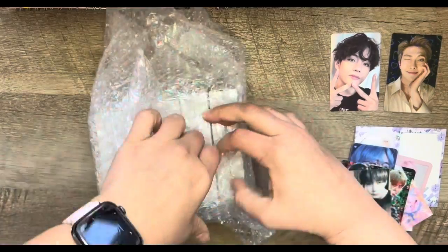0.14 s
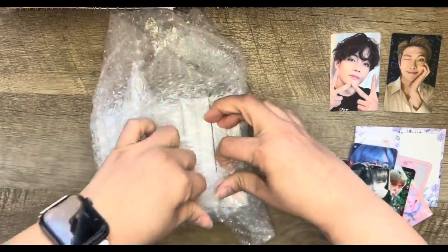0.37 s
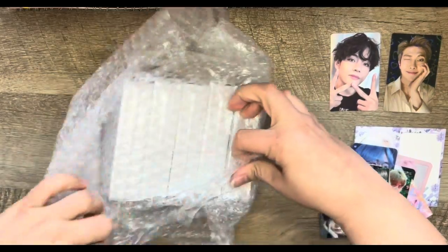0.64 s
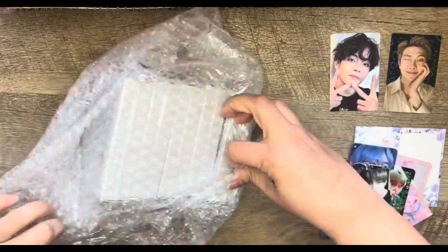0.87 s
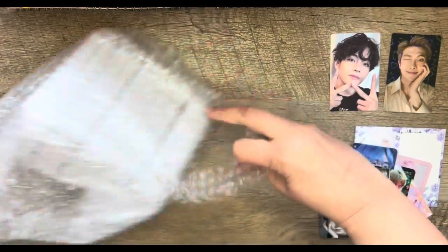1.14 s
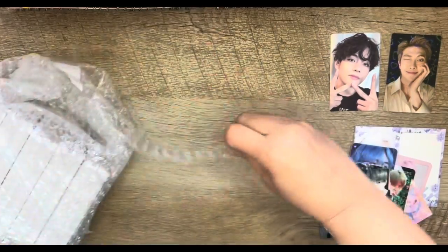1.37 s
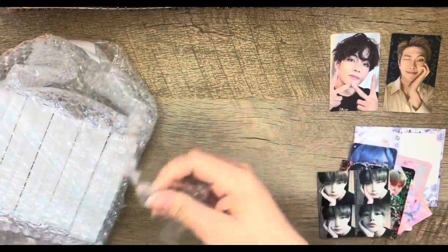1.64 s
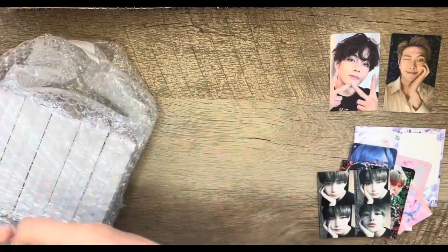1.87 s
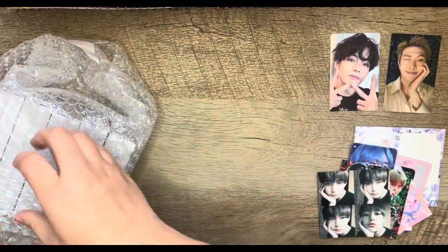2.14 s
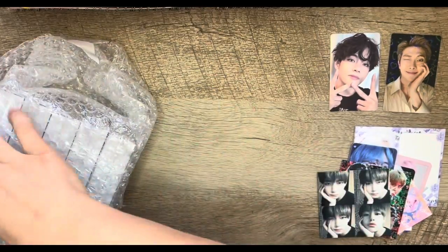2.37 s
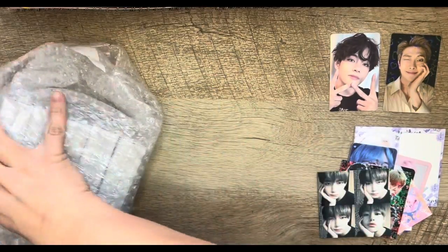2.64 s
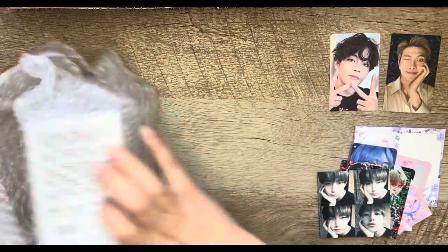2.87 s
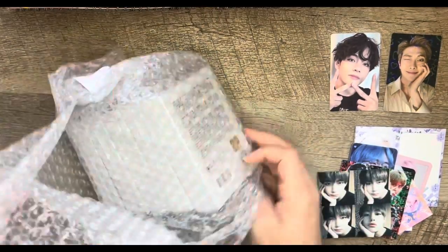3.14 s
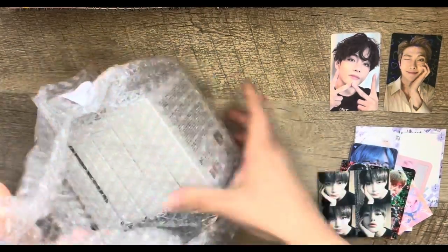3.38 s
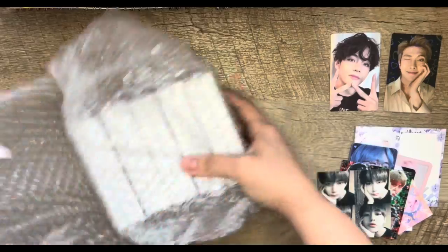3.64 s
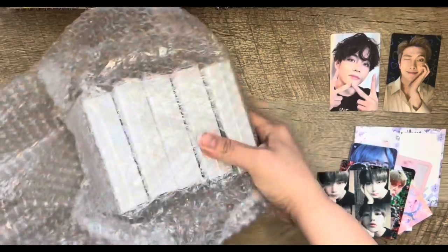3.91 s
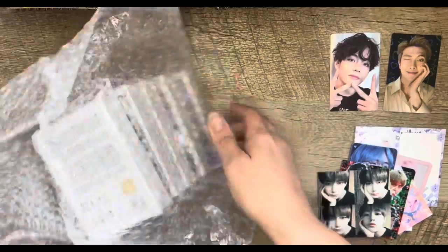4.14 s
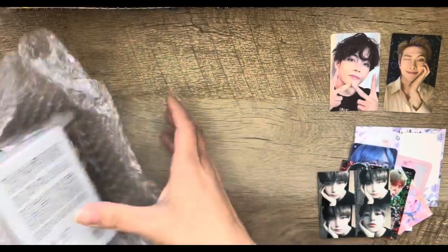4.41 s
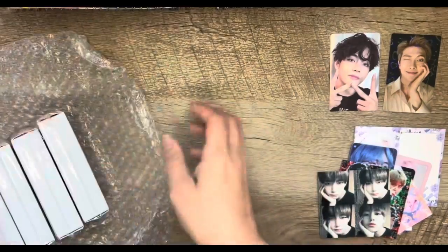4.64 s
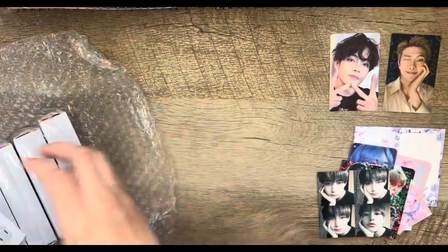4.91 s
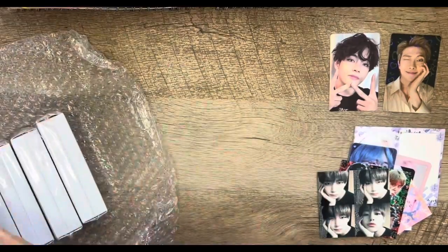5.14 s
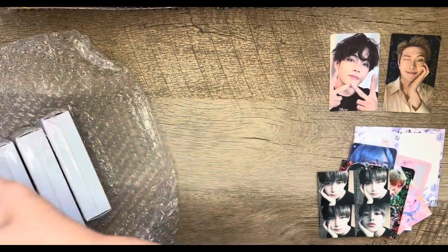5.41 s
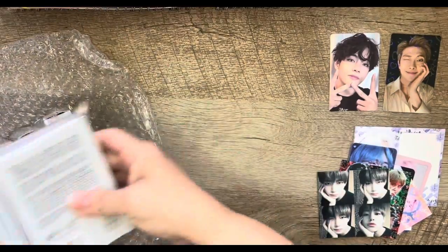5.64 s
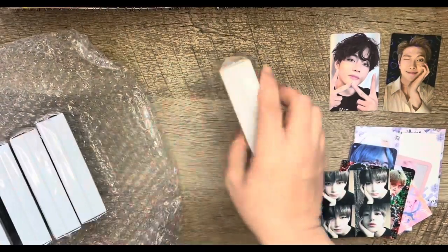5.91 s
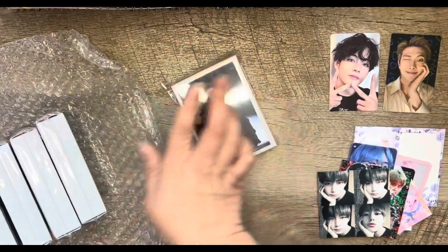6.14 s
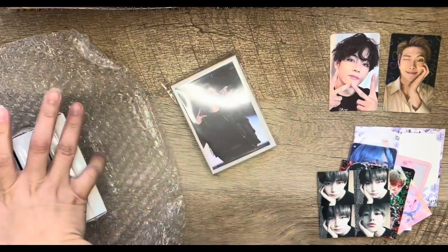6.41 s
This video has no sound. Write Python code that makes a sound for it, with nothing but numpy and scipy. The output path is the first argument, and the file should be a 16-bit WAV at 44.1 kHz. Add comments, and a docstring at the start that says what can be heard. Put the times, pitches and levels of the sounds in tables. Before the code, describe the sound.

Close to the microphone, hands work at crinkly bubble wrap: a faint rustle, then bright snapping crackles, a harsh tape rip with popping air pockets around one second, then quieter rustling. Louder crinkles return midway, and boxes knock on the wooden table. A final sharp burst of crackling is followed by a hard clack as a box is set down. Quiet, small, lightly humming room.

```python
"""On a wooden table in a quiet, humming room, hands pull bubble wrap open, lift small boxes out and set one down.
The film buckles as bursts of shaped noise, dense and tiny or single and loud, with decaying cycles for popping
air pockets and ticks. Boxes and hands excite decaying modes of the table, and its bending waves bring the bass
late. Shaped noise makes the dragging and the room; a short dull reverb follows, heard at two close phone ports."""
import sys
import numpy as np
from scipy import signal
from scipy.fft import rfft, irfft, next_fast_len
from scipy.io import wavfile
from scipy.ndimage import uniform_filter1d

SR = 44100
rng = np.random.default_rng(int(sys.argv[2]) if len(sys.argv) > 2 else 0)


def ratio(d):
    """dB to gain"""
    e = np.asarray(d, float) / 20
    return 10 ** e


def to_wav(sig):
    """Store sig (one row per channel, or 1-D mono) as 16-bit WAV at the path in sys.argv[1].

    Samples outside -1..1 are clipped; the rate is SR.
    """
    pcm = np.clip(np.atleast_2d(sig), -1, 1) * 32767
    pcm = np.round(pcm).astype(np.int16)
    wavfile.write(sys.argv[1], SR, pcm.T)  # frames by channels


N = 287973
SIZE = next_fast_len(N)


def curve(points, hz, column=1):
    """Reads a table of f/Hz and level/dB on a log-frequency axis, as gain."""
    p = np.array(points, float)
    return ratio(np.interp(np.log(np.maximum(hz, 1)), np.log(p[:, 0]), p[:, column]))


def colour(x, points, column=1):
    """Shapes the spectrum of x by a table of f/Hz and level/dB."""
    gain = curve(points, np.fft.rfftfreq(SIZE, 1 / SR), column)
    return irfft(rfft(x, SIZE) * gain, SIZE)[..., :N]


def unit(x):
    """Scales to rms 1."""
    return x / np.sqrt(np.mean(x ** 2))


def band(x, lo_hz, hi_hz):
    """Causal band-pass."""
    sos = signal.butter(2, [lo_hz, min(hi_hz, .45 * SR)], "bandpass", fs=SR, output="sos")
    return signal.sosfilt(sos, x)


def fade(power, t60):
    """Gives every impulse of power an exponential tail, 60 dB down after t60 seconds."""
    return signal.lfilter([1], [1, -np.exp(-2 * np.log(1000) / (t60 * SR))], power)


def walk(rate):
    """Random levels held 1 / rate s and slewed twice; spread near 1."""
    hold = int(SR / rate)
    steps = np.repeat(rng.standard_normal(N // hold + 1), hold)
    return 0.73 * uniform_filter1d(uniform_filter1d(steps, hold), hold)[:N]


def arrivals(count, columns, per_s):
    """Random instants with exponential gaps, as samples, and a row of uniform draws for each."""
    chance = rng.random((count, columns))
    gaps_s = -np.log(1 - chance[:, 0]) / per_s
    at = (np.cumsum(gaps_s) * SR).astype(int)
    return at[at < N], chance[at < N, 1:]


def at_band(hz, body_db, middle_db, treble_db):
    """Level at hz, blended between the body, the middle and the treble."""
    body = np.clip(np.log2(2400 / hz), 0, 1)
    treble = np.clip(np.log2(hz / 5500), 0, 1)
    return middle_db + body * (body_db - middle_db) + treble * (treble_db - middle_db)


def slice_at(x, hz):
    """Takes one of a set of overlapping half-octave bands with raised-cosine edges."""
    steps = 2 * np.log2(np.maximum(np.fft.rfftfreq(SIZE, 1 / SR), 1) / hz)
    return irfft(rfft(x, SIZE) * np.cos(np.pi / 2 * np.clip(steps, -1, 1)) ** 2, SIZE)[..., :N]


# hands working the film: t/s, rustle level in the middle/dB, body level over the middle/dB
RUSTLE_PATH = [(0, -42, -6), (.12, -45, -5.5), (.18, -40.5, -10), (0.299, -43.5, -6), (.335, -26, -10.5),
               (.4, -30, -5.5), (.455, -31.5, -6), (.475, -23.5, -10.5), (.7, -28.5, -3.5),
               (.73, -35.5, -7), (.77, -31, -8), (.79, -28.5, -4.5), (.85, -33.5, -13.5),
               (0.929, -42.5, -7), (.96, -28.5, -11.5), (1.02, -22.5, -3), (1.05, -24, -7),
               (1.074, -37, -8), (1.1, -34, -8), (1.14, -33, -21), (1.165, -41, -6), (1.23, -46, -4),
               (1.32, -36.5, -8.5), (1.38, -46, -9.5), (1.61, -48, -5.5), (1.75, -55, -13),
               (1.94, -49, -10), (2.0, -43, -11), (2.06, -51.5, -5.5), (2.18, -48, -23.5),
               (2.31, -62, -2.5), (2.4, -59, -12), (2.46, -50.5, -8.5), (2.58, -43, -7.5), (2.66, -41, -10),
               (2.7, -42, -6), (2.79, -37.5, -11), (2.86, -37, -8.5), (2.92, -36.5, -5.5),
               (3.04, -42.5, -7.5), (3.12, -38.5, -5), (3.17, -42, -5), (3.21, -38.5, -9), (3.3, -40, -9.5),
               (3.37, -43.5, -7.5), (3.46, -40.5, -8), (3.5, -32, -9), (3.55, -32, -10),
               (3.62, -26.5, -4.5), (3.66, -34, -5), (3.76, -37, -6.5), (3.92, -40, -7), (4.02, -39.5, -6),
               (4.08, -42.5, -9), (4.21, -37, -7), (4.33, -42.5, -12.5), (4.38, -37.5, -2.5),
               (4.44, -40.5, -8.5), (4.49, -36, -2), (4.63, -53.5, -10.5), (4.891, -57, -10),
               (4.95, -51.5, -3), (5.09, -56.5, -10.5), (5.14, -47.5, -2.5), (5.265, -51, -13),
               (5.285, -39, -1.5), (5.33, -45.5, -10), (5.4, -41.5, -11), (5.45, -35, -9),
               (5.53, -39, -14.5), (5.64, -38.5, -5), (5.71, -45, -13), (5.98, -47, -3), (6.11, -51.5, 1.5),
               (6.2, -60, 2), (6.41, -63, -6), (6.46, -50.5, -4.5), (6.53, -46, -8)]


def handling_db(column):
    """Draws one level column of the handling as a line through every sample."""
    rows = np.transpose(RUSTLE_PATH)
    return np.interp(np.arange(N) / SR, rows[0], rows[column])


# loud snaps of film and tape: t/s, level in the middle/dB, body level over the middle/dB
LOUD_SNAPS = [(0.2776, -16.5, -10), (0.317, -24, -11), (0.337, -20, -8.5), (0.354, -21, -9),
              (.3848, -21, -14.5), (0.477, -26, -18.5), (0.537, -23, 1), (0.554, -25, -11),
              (0.5666, -22, -5), (.599, -19.5, -4), (0.6222, -22.5, -5), (0.6475, -19, -4.5),
              (0.6606, -21.5, -20), (0.699, -23, -21), (0.7102, -23.5, -11.5), (0.7804, -23.5, -4),
              (.9, -37.5, -4), (0.9476, -27, -8), (1.0167, -24.5, 3), (1.029, -18.5, -2.5),
              (1.0586, -11.5, -9), (1.0684, -14, -5), (1.0785, -14, -4.5), (1.13, -10, -8),
              (1.1399, -18, 5), (1.1436, -16.5, -10.5), (1.313, -31, -19), (1.3259, -23.5, -12),
              (1.349, -30, -10), (1.453, -37, -5), (1.6761, -41, -18), (1.9644, -39.5, -24),
              (1.985, -41, -15), (2.01, -35.5, -11), (2.024, -40.5, -5), (2.3298, -45, -24),
              (2.434, -41.5, -16.5), (2.5782, -44, -14), (2.616, -48, -9), (2.864, -33, -4),
              (2.9179, -22.5, -10.5), (2.9852, -41.5, -16), (3.0962, -37, -9), (3.113, -36, -16),
              (3.122, -34, -12), (3.1628, -42, -15), (3.2135, -33.5, -5), (3.2747, -28.5, -14),
              (3.305, -45, -19.5), (3.323, -24.5, -9), (3.3656, -51, -16), (3.408, -28.5, -15),
              (3.5022, -30, 2.5), (3.5152, -31.5, 0), (3.5726, -15.5, -1.5), (3.594, -24.5, 3.5),
              (3.603, -22, -13.5), (3.621, -24, -5), (3.627, -21, -23), (3.697, -29, -14), (3.714, -26, -4),
              (3.7828, -37, -16), (3.8325, -29.5, -14), (3.932, -42, -17), (3.981, -46, -25),
              (4.205, -31.5, -13), (4.213, -32, 2.5), (4.3657, -22, -2), (4.4705, -27, 6),
              (4.474, -26.5, -2.5), (4.4785, -25, -3), (4.484, -29, 1), (4.547, -38, -2),
              (4.9303, -41.5, 6.5), (5.116, -40, -16), (5.277, -39.5, -1), (5.358, -32.5, -3),
              (5.3652, -33.5, 7), (5.4211, -16, -13.5), (5.428, -17.5, -7.5), (5.43, -12, -15),
              (5.4378, -14.5, -4), (5.455, -15, -9.5), (5.4644, -18, -11.5), (5.4781, -16, -9),
              (5.497, -20.5, -22), (5.545, -34, -25), (5.6105, -31.5, -24), (5.6356, -12, -13.5),
              (6.0198, -26.5, 3.5), (6.0307, -29.5, 6), (6.084, -30.5, -28.5), (6.14, -21, -4),
              (6.1429, -26, -3), (6.146, -32.5, 7.5), (6.426, -45.5, -22)]


def snaps(rustle_db):
    """Sudden buckling: loud snaps, a stick-slip tape rip and random lesser snaps that follow the rustle.

    Returns sample, middle, body and treble dB."""
    s, middle, body = np.transpose(LOUD_SNAPS)
    # the tape rips in seven unevenly timed steps
    rip_start_s, rip_gap_s, rip_db, rip_body_db = 1.085, 0.006, -13.5, -2.5
    slips = rng.standard_normal((7, 3))
    rip_s = rip_start_s + rip_gap_s * (np.arange(len(slips)) + 0.17 * slips[:, 0])
    rip_middle = rip_db + 2.5 * slips[:, 1]
    rip_body = rip_body_db + 2.5 * slips[:, 2]
    # lesser snaps: mostly near the rustle, now and then well above it
    stray_at, chance = arrivals(400, 3, per_s=16)
    stray_middle = rustle_db[stray_at] - 2 - 2 * np.log(1 - .9 * chance[:, 0])
    stray_body = -6.5 + 14 * (chance[:, 1] - .5)
    at = np.r_[(np.r_[s, rip_s] * SR).astype(int), stray_at]
    middle = np.r_[middle, rip_middle, stray_middle]
    body = np.r_[body, rip_body, stray_body]
    # big creases have more body and less treble
    treble = -11 - 0.56 * body
    return at, middle, middle + body, middle + treble


BANDS_HZ = 280 * 2 ** np.arange(0, 6.1, .5)
# colour of the film noise: f/Hz, relative level per Hz/dB
FILM_COLOUR = [(150, -63), (250, -8.5), (500, -7), (1050, -7), (1400, -6), (2000, -2), (4000, -2.5),
               (7000, -3), (9000, -7), (12000, -9.5), (14000, -15.5), (15800, -16.5), (16300, -78)]
# body, middle and treble zones of the film: low edge f/Hz, high edge f/Hz
FILM_ZONES = [(500, 1500), (2000, 8000), (8000, 15000)]


def film():
    """Buckling creases: bursts of film noise with a sharp start; row 0 reaches both ports, row 1 is unshared."""
    middle_db = handling_db(column=1)
    body_db = middle_db + handling_db(column=2)
    treble_db = middle_db - 1.5
    count, hiss = 5000, .25  # faint creases, steady share of the rustle power
    at = rng.integers(0, N, count)
    # many faint creases, few strong ones
    size_db = np.minimum(4 * rng.exponential(1, count), 13)
    snap_at, snap_middle, snap_body, snap_treble = snaps(middle_db)
    carrier = colour(rng.standard_normal((2, N)), FILM_COLOUR)
    # gains that bring each zone of the film's colour to unit level
    unit_body, unit_middle, unit_treble = (-20 * np.log10(np.std(band(carrier, *z))) for z in FILM_ZONES)
    # a film surface sheds its noise evenly from one instant to the next
    carrier /= np.sqrt(uniform_filter1d(carrier ** 2, size=45)) / np.std(carrier)
    flutter_db = 0.83 * walk(16)
    # the crease flips in one step, inward or outward, just after the snap starts
    crack_db, tail_db, settle_s, click_db, click_s = 3.0, -23, 0.18, 15, .0008
    flip = np.sign(rng.standard_normal((2, len(snap_at))))
    flip_at = np.minimum(snap_at + int(click_s * SR), N - 1)
    out = 0
    for hz in BANDS_HZ:
        # bigger patches of film ring lower and longer
        t60 = 0.023 * (3000 / hz) ** 0.053
        patchy_db = 3.5 * rng.standard_normal(count)
        small = fade(np.bincount(at, ratio(2 * (size_db + patchy_db)), N), t60)
        small = (1 - hiss) * small / small.mean() + hiss
        # as the sheet shifts, other patches take over and the colour wanders
        wander_db = 1.8 * walk(18)
        small *= ratio(2 * (flutter_db + wander_db + at_band(hz, body_db, middle_db, treble_db)))

        loud_db = at_band(hz, snap_body, snap_middle, snap_treble)
        loud_db += 2.5 * rng.standard_normal(len(snap_at))
        # a small crease is too small to radiate bass
        loud_db -= 1.8 * max(np.log2(600 / hz), 0)
        hits = np.bincount(snap_at, ratio(2 * loud_db), N)
        # a sharp crack, a short ring, then the crease keeps settling
        crack = ratio(2 * crack_db) * fade(hits, 0.0011)
        settling = ratio(2 * tail_db) * fade(hits, settle_s)
        # a snap takes a fraction of a millisecond to build
        loud = uniform_filter1d(crack + fade(hits, t60) + settling, size=13)

        click = np.array([np.bincount(flip_at, way * ratio(loud_db + click_db), N) for way in flip])
        click *= curve(FILM_COLOUR, hz)
        # clicks are weaker in the bass, the unshared ones more so
        click *= min(hz / 2500, 1) * np.array([[1], [min(hz / 3000, 1)]])
        gain = ratio(at_band(hz, unit_body, unit_middle, unit_treble))
        out = out + gain * slice_at(carrier * np.sqrt(small + loud) + click, hz)
    return out


# colour of the room: f/Hz, relative level per Hz/dB
ROOM_COLOUR = [(15, -47.5), (25, 9), (70, 22.5), (180, -2.5), (427, 7), (988, -58), (1790, 0), (2760, -18),
               (2990, -16), (3920, -53), (7110, -2.5), (11300, -42), (16000, -37)]


def room_tone():
    """Low rumble and faint hiss: shaped noise whose level wanders gently."""
    noise = colour(rng.standard_normal((2, N)), ROOM_COLOUR)
    # sound from all sides differs more between the ports than sound from close by
    diffuse = ratio(np.array([[0], [5.0]]))
    return diffuse * unit(noise) * ratio(-56 + 1.6 * walk(4.4))


# the parcel dragging on the table: t/s, level/dB
DRAG_PATH = [(0, -53), (.37, -60), (.4, -45), (.46, -52), (.52, -61), (.57, -46), (.67, -37), (.72, -49),
             (.8, -40.5), (.9, -68), (1.0, -38.5), (1.14, -38), (1.2, -51.5), (1.5, -61), (2.4, -62.5),
             (2.9, -47), (3.1, -59), (3.6, -46), (3.9, -57), (4.5, -47.5), (4.65, -55), (4.9, -65.5),
             (5.3, -53.5), (5.45, -41), (5.6, -57), (6.0, -49.5), (6.37, -60.5), (6.5, -50)]


def drag():
    """Friction under the parcel: low noise that follows the dragging and flutters."""
    rub = unit(band(rng.standard_normal(N), 37, 230))
    path_db = np.interp(np.arange(N) / SR, *np.transpose(DRAG_PATH))
    return rub * ratio(path_db + 2.9 * walk(22))


# air pockets that burst or cave in: t/s, level/dB, f/Hz
AIR_POCKETS = [(.1725, -31.5, 1300), (.5355, -12.5, 1880), (.5535, -11, 1160), (.5668, -17.5, 1060),
               (.6225, -15.5, 785), (1.0695, -15, 1000), (1.0805, -16.5, 1110), (1.0905, -16.5, 800),
               (1.1055, -9, 1070), (1.1085, -12, 1180), (1.1135, -6.5, 990), (1.119, -14.5, 920),
               (1.1308, -5.5, 970), (2.6168, -27, 2800), (2.7288, -27, 2700), (3.5015, -22, 990),
               (3.1135, -22, 2080), (3.5722, -8, 1020), (4.418, -34, 1000), (6.0205, -16, 1720),
               (6.1415, -14, 2030), (6.144, -9.5, 2770), (6.029, -21, 2580), (6.031, -35, 1400),
               (6.039, -30, 2200), (4.479, -20.5, 1520)]


def pops():
    """Bursting pockets and tiny ticks: a few fast-dying cycles of a resonance each."""
    s, db, hz = np.transpose(AIR_POCKETS)
    pop_cycles, tick_cycles = 9.4, 5.6  # until 60 dB down
    tick_at, chance = arrivals(2500, 4, per_s=220)
    # tick levels ride on the rustle
    tick_db = handling_db(column=1)[tick_at] + 5 - 2 * np.log(1 - .97 * chance[:, 0])
    tick_octaves = 1.26 * (chance[:, 1] + chance[:, 2] - 1)  # around 4550 Hz
    tick_hz = np.minimum(4550 * 2 ** tick_octaves, .3 * SR)
    cycles = np.r_[np.full(len(s), pop_cycles), np.full(len(tick_at), tick_cycles)]
    at = np.r_[(s * SR).astype(int), tick_at]
    db, hz = np.r_[db, tick_db], np.r_[hz, tick_hz]
    step = np.arange(512)
    turns = hz[:, None] * step / SR
    swell = 1 - np.exp(-3.0 * turns)
    decay = np.exp(-np.log(1000) * turns / cycles[:, None])
    grains = 2 * ratio(db)[:, None] * swell * decay * np.sin(2 * np.pi * turns)
    return np.bincount((at[:, None] + step).ravel(), grains.ravel(), N)[:N]


# knocks on the table: t/s, upper level/dB, deep thud level/dB, favoured f/Hz (levels before the trims)
TABLE_KNOCKS = [(0.432, -36, -45.5, 624), (0.67, -28, -45, 845), (0.796, -40, -43.5, 690),
                (0.998, -21.5, -51.5, 730), (1.149, -30.5, -48.5, 275), (1.884, -43, -80, 415),
                (2.912, -32, -50, 444), (3.107, -33.5, -58, 454), (3.451, -34.5, -66.5, 338),
                (3.5, -33, -46, 845), (3.571, -22, -38.5, 899), (3.625, -25, -46, 420),
                (3.835, -34, -48, 258), (4.033, -31, -44.5, 610), (4.202, -30, -45, 282),
                (4.367, -31.5, -45.5, 600), (4.474, -13.5, -50, 610), (4.484, -17.5, -45, 340),
                (4.501, -34, -51, 500), (4.522, -31, -58, 620), (4.928, -31.5, -53, 376),
                (5.275, -40, -74, 654), (5.353, -25, -56, 500), (5.364, -24, -56, 800),
                (5.423, -23, -49, 713), (5.433, -31, -39, 400), (5.459, -32, -45, 450),
                (5.478, -35, -52, 380), (5.632, -20, -43, 307), (5.722, -34, -56, 264),
                (5.817, -38, -62, 382), (5.939, -36, -72, 611), (6.016, -16.5, -53, 890),
                (6.027, -17.5, -34.5, 550), (6.139, -13, -66, 625), (6.143, -15, -52, 268),
                (6.172, -36, -59, 330), (6.444, -43.5, -51.5, 403)]
# ringing modes of the table top: nominal f/Hz, level/dB, t60/s
TABLE_MODES = [(62, 1.5, 0.27), (103.2, 15, 0.17), (132, 6.5, 0.11), (268, 13, 0.079), (376, 16, 0.032),
               (444, 9.5, 0.051), (625, 16, 0.03), (779, 8.5, 0.05), (1060, -4, 0.027)]


def knocks():
    """Blows ring the table's modes; bending waves are slower in the bass, so each knock sweeps down."""
    blow_db, thud_db, narrow_db = -14, -3.0, 10  # upper trim, deep trim, loss per octave off the favoured pitch
    lag_s, clatter_s = .003, .004  # wave delay at 600 Hz, longest wait of a contact
    t = np.arange(int(.3 * SR)) / SR
    ring = np.zeros(N)
    scatter = rng.standard_normal((len(TABLE_KNOCKS), len(TABLE_MODES), 2))
    late = rng.random((len(TABLE_KNOCKS), len(TABLE_MODES)))
    for (s, db, deep_db, spot_hz), chance, waits in zip(TABLE_KNOCKS, scatter, late):
        for (hz, mode_db, t60), (detune, uneven), wait in zip(TABLE_MODES, chance, waits):
            # each spot and softness of contact favours the modes near one pitch
            upper_db = db + blow_db - narrow_db * abs(np.log2(hz / spot_hz)) + 1.8 * uneven
            gain = ratio(mode_db + (deep_db + thud_db if hz < 200 else upper_db))
            # corners and edges land one after another
            i = int((s + clatter_s * wait) * SR)
            n = min(len(t), N - i)
            tone = np.sin(2 * np.pi * hz * (1 + 0.015 * detune) * t)
            ring[i:i + n] += (gain * tone * np.exp(-np.log(1000) * t / t60))[:n]
    hz = np.fft.rfftfreq(N, 1 / SR)
    # group delay lag_s * sqrt(600 / f)
    return irfft(rfft(ring) * np.exp(-4j * np.pi * lag_s * np.sqrt(600 * hz)), N)


# heavy landings that push the whole top: t/s, level/dB
HEAVY_LANDINGS = [(0.794, -34), (3.572, -29), (3.625, -42), (4.033, -43), (4.482, -19), (5.423, -20.5),
                  (5.631, -14), (6.028, -32)]


def bending_wave():
    """Each landing sends one push through the top; it arrives spread out, high first and low last."""
    lag_s, top_hz, low_hz = 0.0065, 420, 35  # delay at 600 Hz, soft upper and lower limits
    s, db = np.transpose(HEAVY_LANDINGS)
    hz = np.fft.rfftfreq(SIZE, 1 / SR)
    spread = np.exp(-(hz / top_hz) ** 2 - 4j * np.pi * lag_s * np.sqrt(600 * hz))
    spread *= hz ** 2 / (hz ** 2 + low_hz ** 2)
    blows = np.bincount((s * SR).astype(int), ratio(db), N)
    return irfft(rfft(blows, SIZE) * spread, SIZE)[:N] / np.abs(irfft(spread, SIZE)).max()


def walls(x, t60=0.18):
    """Reflections as a short dull tail of decaying noise, in a shared and an unshared row."""
    t = np.arange(int(.5 * SR)) / SR
    tail = band(rng.standard_normal((2, len(t))), 227.6, 4100)
    tail *= np.exp(-np.log(1000) * t / t60) * (t > .004)
    tail /= np.sqrt(np.sum(tail ** 2) / 2)
    return ratio(-20.5) * signal.fftconvolve(x[None], tail, axes=1)[:, :N]


# the two microphone ports: f/Hz, unshared level/dB, quarter-turned level/dB
PORT_SPREAD = [(60, -28, -54), (245, -20, -30), (610, -7, -11.5), (1400, -34, -7.5), (2710, -7, -76),
               (4460, -12.5, -21), (5490, -6.5, -5), (9700, -5.5, -4), (13000, -5.5, -3), (16000, -2.5, 1)]
# in-phase part that favours the left port: f/Hz, level/dB
LEFT_FAVOUR = [(100, -61), (230, -18), (380, -20.5), (800, -36.5), (1500, -61.5)]


def scene():
    """Film, table and room as they arrive at two close ports."""
    wood = knocks() + drag() + bending_wave() + pops()
    # a faint, slightly delayed copy of the table is unshared
    shared, own = film() + room_tone() + np.array([wood, 0.07 * np.roll(wood, 60)])
    tail = walls(shared)
    shared, own = shared + tail[0], own + tail[1]
    # the treble reaches the ports a fraction of a turn apart
    quarter_turned = signal.hilbert(shared, SIZE).imag[:N]
    side = colour(own, PORT_SPREAD) + colour(quarter_turned, PORT_SPREAD, column=2)
    side += colour(shared, LEFT_FAVOUR)
    return np.array([shared + side, shared - side])


def band_limit(x):
    """A steep low-pass at the top of the band."""
    return signal.sosfilt(signal.butter(12, 16820, fs=SR, output="sos"), x)


def record(dry):
    """The phone cuts the deepest bass and rounds the highest peaks."""
    cut = signal.sosfilt(signal.butter(4, 46, "highpass", fs=SR, output="sos"), dry)
    mix = 0.81 * np.tanh(cut / 0.97)
    return band_limit(mix)


dry = scene()
out = record(dry)
to_wav(out)
```